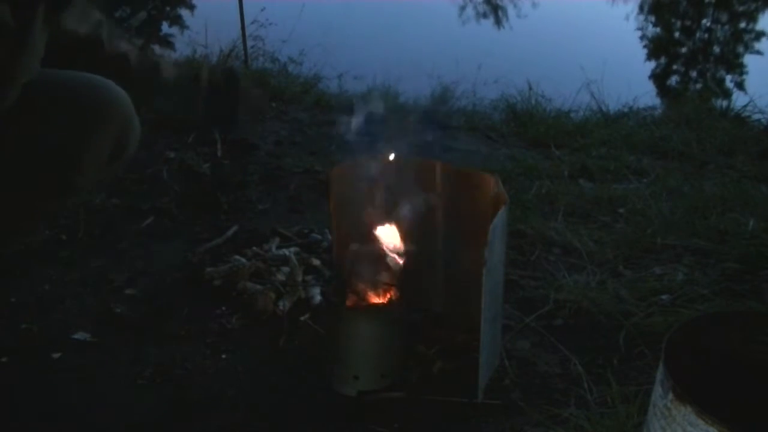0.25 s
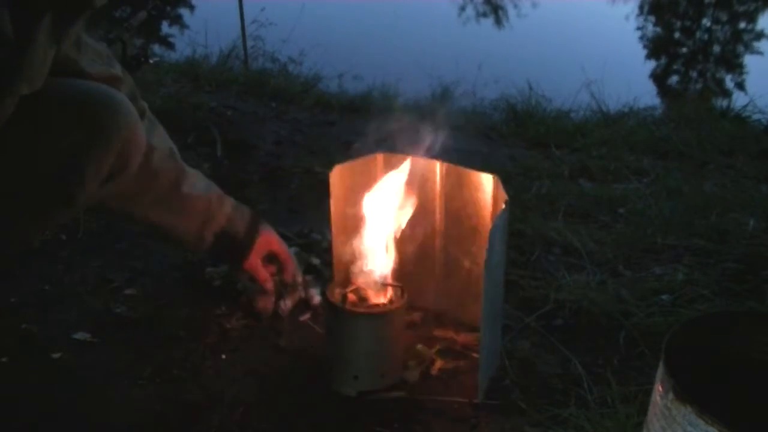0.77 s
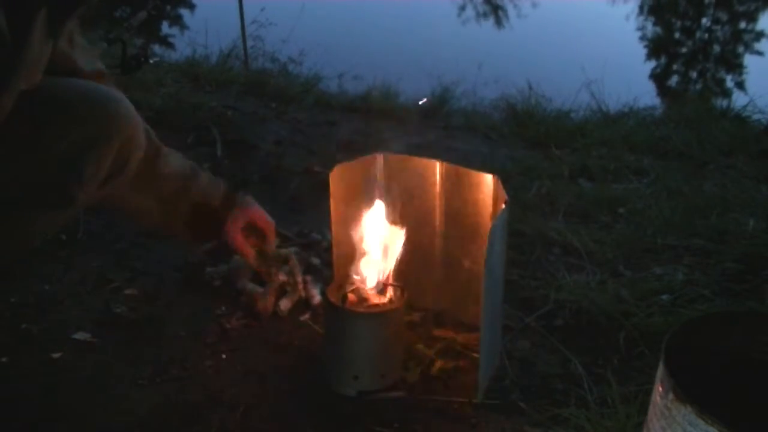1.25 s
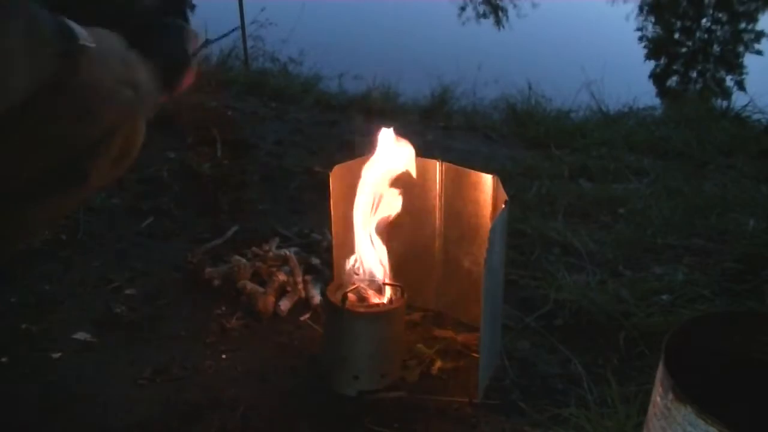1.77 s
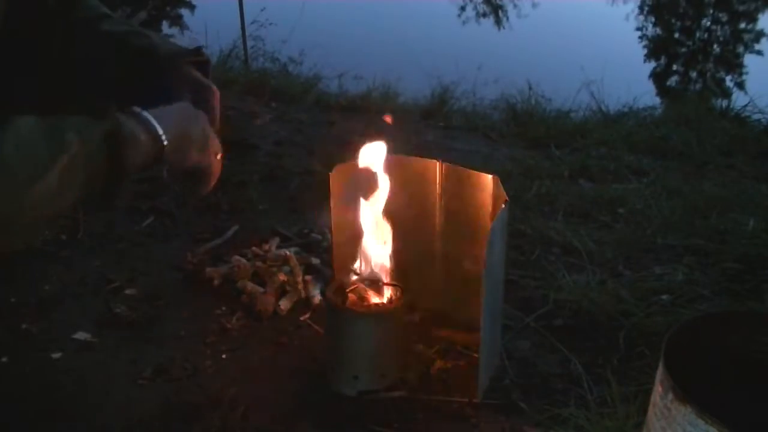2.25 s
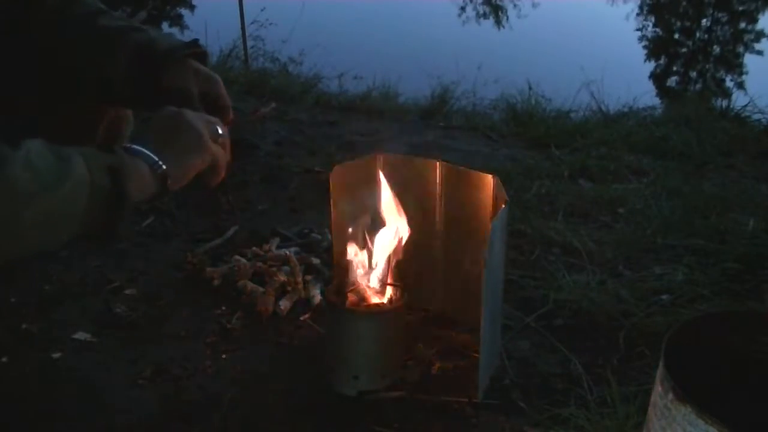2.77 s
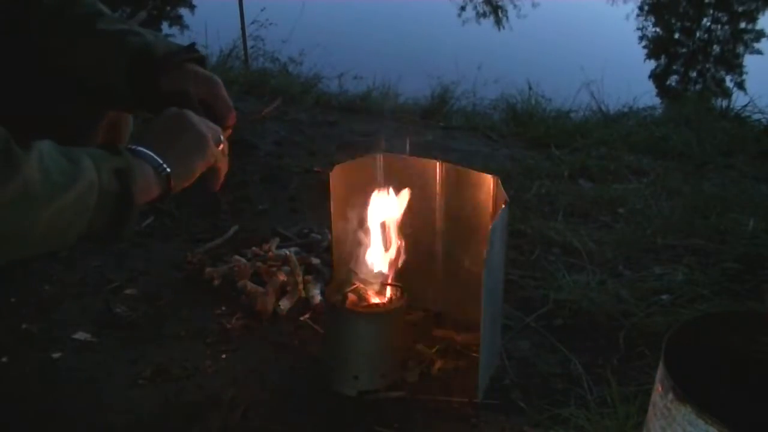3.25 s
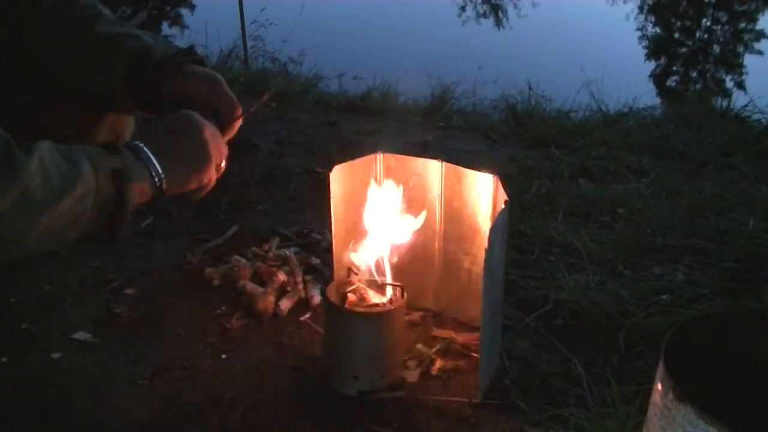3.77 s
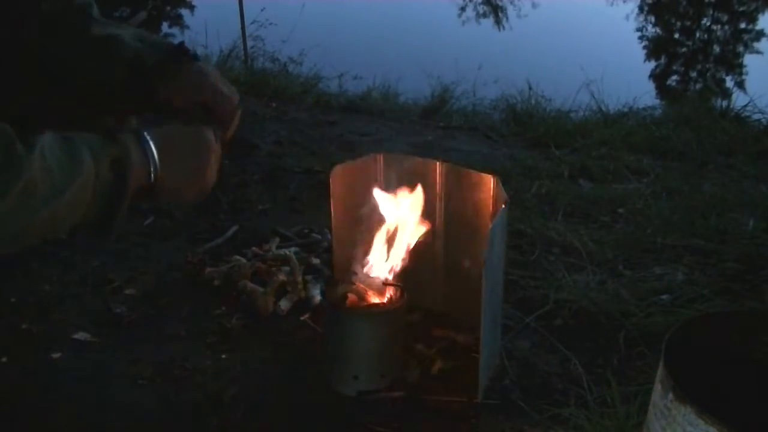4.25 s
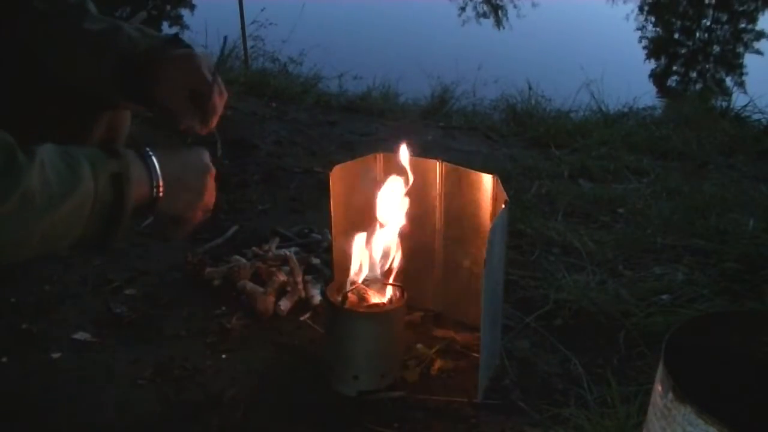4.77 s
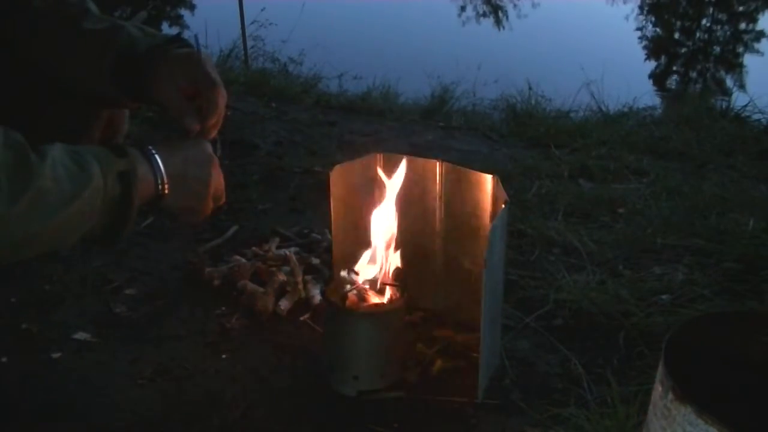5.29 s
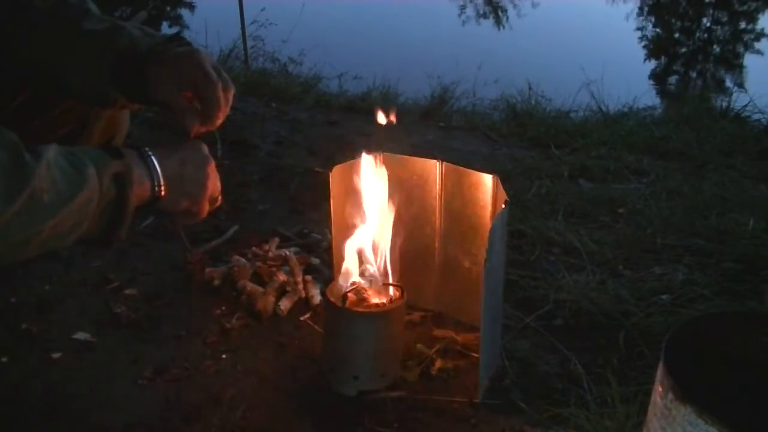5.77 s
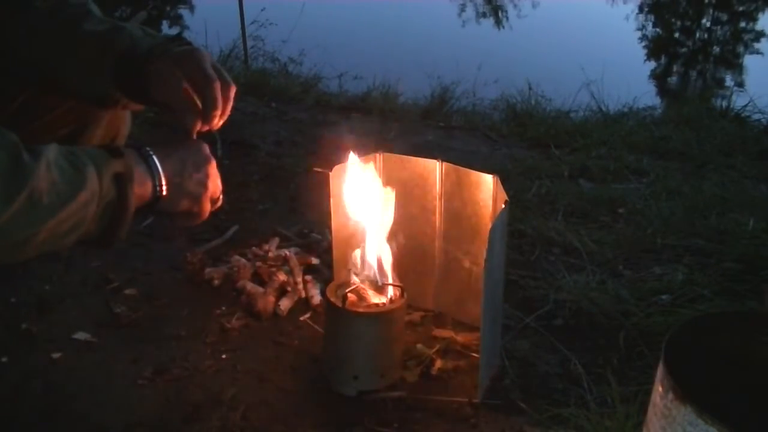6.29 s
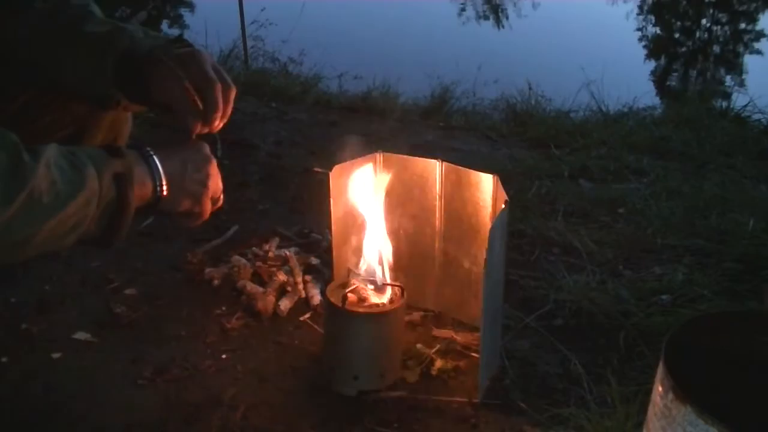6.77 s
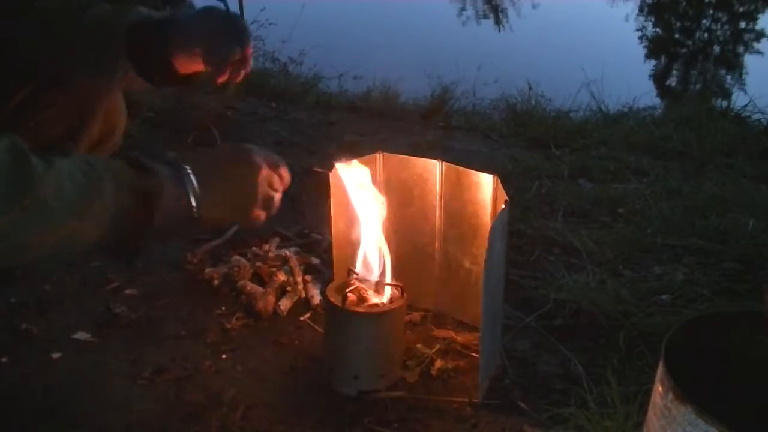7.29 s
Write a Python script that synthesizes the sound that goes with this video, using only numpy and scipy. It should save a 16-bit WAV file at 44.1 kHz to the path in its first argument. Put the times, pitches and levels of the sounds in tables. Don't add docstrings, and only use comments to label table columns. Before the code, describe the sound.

Dry crackles and twig snaps from a little camp stove, one brief hissing cloth slide, and steady high cricket chirping in quiet night air.

```python
import sys
import numpy as np
from scipy import signal
from scipy.fft import rfft, irfft
from scipy.io import wavfile
from scipy.ndimage import uniform_filter1d

SR = 44100
rng = np.random.default_rng(int(sys.argv[2]) if len(sys.argv) > 2 else 0)


def field_ratio(decibels):
    return 10 ** (np.asarray(decibels, dtype=float) / 20)


def output_pcm(signal):
    pcm = np.clip(np.atleast_2d(signal).T, -1, 1) * 32767
    wavfile.write(sys.argv[1], SR, np.round(pcm).astype(np.int16))


N = 332073
HIT_N = 1600

# (f/Hz, level/dB, t60/s)
HOLLOW_MODES = [(893, 6, 0.038), (1500, 3.5, 0.035)]
WALL_MODES = [(2062, -2.5, 0.012), (2792, 1, 0.02)]
BRIGHT_MODES = [(4087, 9, .018), (4800, 7, 0.011), (5550, -2.5, 0.032), (6810, -4.5, 0.014),
                (6930, 0, 0.02)]


def evened(x):
    return x / np.sqrt(np.mean(x ** 2) + 1e-20)


def peaked(x):
    return x / (abs(x).max() + 1e-12)


def curve(rows):
    t_s, *columns = np.transpose(rows)
    return [np.interp(np.arange(N) / SR, t_s, column) for column in columns]


def read(points, hz):
    point_hz, value = np.transpose(points)
    return np.interp(np.log(hz + 1), np.log(point_hz + 1), value)


def resonate(x, hz, width_hz):
    turn = np.exp(2j * np.pi * np.cumsum(hz * np.ones(len(x))) / SR)
    pole = np.exp(-np.pi * width_hz / SR)
    smooth = signal.lfilter([1 - pole], [1, -pole], x / turn + 1e-18)
    return 2 * (turn * smooth).real


def band(x, lo_hz, hi_hz):
    return signal.sosfilt(signal.butter(2, [lo_hz, hi_hz], "bandpass", fs=SR, output="sos"), x)


def highpass(x, order, hz):
    return signal.sosfilt(signal.butter(order, hz, "highpass", fs=SR, output="sos"), x)


def noise(colour, same, patchy_db, flicker_db):
    frames, hz = N // 128 + 5, np.fft.rfftfreq(512, 1 / SR)
    a, b, c, d, patches = rng.standard_normal((frames, 257, 5)).T
    patches = uniform_filter1d(patches, size=6, axis=0)
    patches = evened(uniform_filter1d(patches, size=16, axis=1))
    flicker = evened(uniform_filter1d(rng.standard_normal(frames), size=4))
    same = np.clip(same * np.ones(len(hz)), -1, 1)[:, None]
    left = a + 1j * b
    right = same * left + np.sqrt(1 - same ** 2) * (c + 1j * d)
    level_db = read(colour, hz)[:, None] + patchy_db * patches + flicker_db * flicker
    spectra = np.array([left, right]) * field_ratio(level_db)
    return evened(signal.istft(spectra, nperseg=512, noverlap=384)[1][:, :N])


def ring(modes, t):
    return sum(field_ratio(db - 60 * t / t60) * np.sin(2 * np.pi * hz * t) for hz, db, t60 in modes)


def fire():
    # (t/s, peak/dB, can hollow/dB, wall ring/dB, treble/dB, burst/ms)
    pops = [(0.0301, -30.5, -11, -20, -8, 0.66), (0.1526, -41, -20, -18, -12, 0.9),
            (0.2503, -32, -14, -4, -11, 0.9), (0.4547, -18.5, -20.5, -11, -1.5, 0.9),
            (0.5619, -16, -20.5, -11.5, -11, 0.54), (0.633, -41.5, -2, -7, -6, 0.9),
            (0.6543, -45, -8, -18, -5, 0.9), (0.946, -31.5, -17, -16, -10, 0.9),
            (0.9987, -21.5, -22, -13.5, -21, 0.9), (1.075, -22, -46, -19, -41, 1),
            (1.2775, -38, -0.5, -3.5, -15, 1), (1.4272, -41, -15, -13, -9, 0.9),
            (1.5617, -37.5, -8, -18, -16, 0.9), (2.4568, -42, -9, -6, -11, 0.9),
            (2.5491, -44, -22, 8, -11, 0.9), (2.6552, -29.5, -13, -16, -4, 0.9),
            (2.6999, -21.5, -24, -15.5, -32, 0.62), (2.751, -33.5, -11.5, -10.5, -12, 0.9),
            (2.8744, -53, -8, -16, -6, 0.9), (2.9272, -39, -16, -12, -11, 0.9),
            (2.9725, -28.5, -18, -10.5, -12, 0.9), (3.0278, -31.5, -15.5, -11, -13, 1),
            (3.068, -37.5, -10, -17, -10, 0.77), (3.463, -46.5, -2, -12, 0, 0.9),
            (3.706, -22, -18.5, -11, -8, 0.79), (3.8452, -34.5, -14, -12.5, -16, 0.9),
            (3.914, -31, -16, -14, 4, 1), (4.0043, -44.5, -22, -2, -8, 0.83),
            (4.0345, -33.5, -21, -15, 5, 0.9), (4.1774, -48, 0, -10, -6, 0.9),
            (4.2033, -26.5, -24, -17, -14, 0.76), (4.3077, -35, -19, -16, -9, 0.9),
            (4.396, -40.5, -7, -10, -8, 1), (4.5222, -45, -22, -23, -6, 0.9),
            (4.8799, -45, -5, -16, -7, 0.9), (5.031, -38, -7, -16, -7, 0.9),
            (5.1587, -44, -22, -21, -11, 0.9), (5.3468, -44.5, -5, -7, -8, 0.9),
            (5.3775, -42, -10, -3.5, -11, 0.9), (5.4117, -27, -14.5, -6.5, -10, 0.9),
            (5.4915, -29.5, -10.5, -31, -8, 0.67), (5.5224, -32.5, -13, -9.5, -13, 0.9),
            (5.7399, -43.5, -3, -20, -13, 0.73), (5.8317, -46, -14, -14, -5, 0.9),
            (6.2313, -34, -16, -13, -19, 0.9), (6.4841, -26, -19, -11.5, -7, 1),
            (6.5386, -37, -20, -8, -12, 0.9), (6.6753, -21.5, -44, -18, -35, 0.9),
            (6.6992, -37, -16, -22, -10, 0.9), (6.827, -26, -29, -19, -10, 0.9),
            (6.9442, -33.5, -20, -20, -14, 0.9), (7.243, -22.5, -24.5, -12.5, -39, 1),
            (7.2994, -25.5, -22.5, -23, -32, 0.67)]
    # (t/s, peak/dB, body/dB, low knock/dB, burst/ms)
    snaps = [
        (3.4958, -34.5, -16, -3, 5.3),
        (3.5027, -19.5, -15, -24, 2.5),
        (3.5098, -20.5, -6, -25, 2.2),
        (3.5174, -18, -8, -23, 4.7),
        (4.2036, -43, 6, 4, 4.5),
        (4.2218, -12, -5, -30, 4.7),
        (4.2262, -28, -6, -6, 1.5),
    ]
    # (t/s, peak/dB, f/Hz, t60/s)
    knocks = [(0.014, -41, 493, 0.034), (0.429, -49, 467, 0.03), (0.479, -45, 1020, 0.03),
              (0.623, -43, 1290, 0.041), (0.654, -43, 496, 0.034), (0.699, -45.5, 434, 0.021),
              (0.768, -48.5, 310, 0.03), (0.805, -46, 448, 0.03), (0.819, -46, 490, 0.024),
              (0.839, -51, 358, 0.037), (0.979, -51, 514, 0.027), (0.996, -42, 1500, 0.03),
              (1.275, -37.5, 850, 0.028), (1.769, -45, 1320, 0.03), (2.639, -46, 480, 0.017),
              (2.759, -48, 845, 0.034), (2.846, -47.5, 435, 0.03), (3.026, -46.5, 404, 0.033),
              (3.069, -47.5, 490, 0.027), (3.222, -54.5, 406, 0.034), (3.304, -48.5, 463, 0.024),
              (3.339, -49, 840, 0.033), (3.439, -47, 409, 0.023), (4.349, -53, 415, 0.028),
              (4.439, -55, 266, 0.041), (4.466, -47, 520, 0.039), (4.7, -49.5, 467, 0.033),
              (5.292, -54, 563, 0.032), (6.409, -48.5, 425, 0.024), (6.979, -53, 506, 0.03),
              (7.018, -51, 450, 0.048), (2.549, -33, 1420, 0.033), (2.55, -42, 2430, .03),
              (7.499, -32.5, 3140, 0.049), (7.501, -36, 1410, .03)]
    out = np.zeros(N + HIT_N)
    fade = signal.windows.tukey(2 * HIT_N, .3)[HIT_N:]
    for table, source in ((pops, pop), (snaps, snap), (knocks, knock)):
        for t_s, *shape in table:
            start = round(t_s * SR)
            out[start:start + HIT_N] += source(*shape) * fade
    ticks_per_s = 45
    tick_size = field_ratio(3.8 * np.minimum(rng.exponential(1, N), 4))
    ticks = tick_size * (rng.random(N) < ticks_per_s / SR)
    tick = ring(HOLLOW_MODES + WALL_MODES + BRIGHT_MODES, np.arange(800) / SR)
    bed = field_ratio(-76) * evened(signal.oaconvolve(ticks, tick)[:N])
    hits = highpass(out[:N] + bed, 3, 220)
    right = hits + 0.045 * (np.roll(hits, shift=2) - hits)
    return np.array([hits, right]) * field_ratio(np.array([[.15], [-.15]]))


def pop(db, hollow_db, wall_db, treble_db, burst_ms):
    t = np.arange(HIT_N) / SR
    drive = cracks(t, burst_ms, scatter_db=-13, scatter_t60=.025, share=.05, first=4.0)
    detuned_t = t[:800] * (1 + 0.02 * rng.standard_normal())
    hollow, wall, upper = (peaked(np.convolve(drive, ring(modes, detuned_t))[:len(t)])
                           for modes in (HOLLOW_MODES, WALL_MODES, BRIGHT_MODES))
    bright = peaked(peaked(band(drive, 3630, 9160)) + field_ratio(-7.5) * upper)
    treble = peaked(band(drive, 8000, 15000))
    body = field_ratio(hollow_db - 0.5) * hollow + field_ratio(wall_db) * wall
    return field_ratio(db) * (bright + body + field_ratio(treble_db + 6) * treble)


def snap(db, body_db, knock_db, burst_ms):
    t = np.arange(HIT_N) / SR
    drive = cracks(t, burst_ms, scatter_db=-13, scatter_t60=.02, share=.06, first=2.5)
    bright = band(drive, 4500, 14000)
    body = band(drive - 1.5 * bright, 1300, 4440)
    low = band(drive, 490, 1300)
    return field_ratio(db) * (peaked(bright) + field_ratio(body_db) * peaked(body) + field_ratio(knock_db) * peaked(low))


def knock(db, hz, t60):
    t = np.arange(HIT_N) / SR
    blow = np.hanning(60) * (1 + 2.3 * rng.standard_normal(60))
    modes = ring([(hz, 0, t60), (hz * 1.03, -4, t60 * 0.73), (hz * 2.13, -9, t60 * 0.54)], t)
    return field_ratio(db) * peaked(np.convolve(np.diff(blow), modes)[:len(t)])


def cracks(t, burst_ms, scatter_db, scatter_t60, share, first):
    chance, size = rng.random(len(t)), rng.laplace(size=len(t))
    burst = size * (chance < share) * np.exp(-(t * 1000 / max(burst_ms, .05)) ** 4)
    burst[0] = first
    tail_db = scatter_db - 60 * np.maximum(t - burst_ms / 1000, 0) / scatter_t60
    return burst + field_ratio(tail_db) * rng.standard_normal(len(t))


def flame():
    # (t/s, level/dB)
    flutter = [(0.0, -57.5), (0.52, -62), (0.77, -56), (0.92, -63.5), (1.09, -64), (1.61, -62),
               (1.86, -58.5), (2.12, -62.5), (2.29, -62.5), (2.75, -62), (3.88, -65), (4.28, -56.5),
               (4.45, -62), (5.18, -68), (5.51, -67.5), (7.0, -66), (7.15, -69.5), (7.53, -61.5)]
    # (f/Hz, level/dB)
    flame_colour = [(40, -51), (100, -22.5), (220, -3), (450, 1.5), (900, -5.5), (1800, -10.5), (4000, -40)]
    return field_ratio(curve(flutter)[0] - 3.0) * noise(flame_colour, 0.86, patchy_db=3.0, flicker_db=2.0)


def slide():
    # (t/s, level/dB, low shelf/dB, high shelf/dB)
    drag = [
        (1.44, -62, 1, -2),
        (1.544, -49, 1, -2),
        (1.568, -40.5, -15, 3),
        (1.718, -38, -14, 3.5),
        (1.76, -42.5, -1.5, 2.5),
        (2.254, -45, 4, 0),
        (2.272, -43, 2, 3),
        (2.328, -60, 4, 4),
        (2.36, -52, 1, 0.5),
    ]
    # (f/Hz, level/dB per Hz)
    drag_colour = [(180, -52), (300, -29), (431, -11), (720, -9.5), (1050, -5), (1640, -6), (1970, -2),
                   (2210, -4.5), (3020, -2), (3870, -6), (5050, -7), (8140, -17.5), (11300, -20.5),
                   (15500, -35)]
    # (t/s, f/Hz, level/dB)
    fold_path = [(1.55, 1330, -12), (1.62, 1500, -7), (1.68, 1980, 0), (1.72, 2230, 1), (1.76, 2960, -9),
                 (1.81, 2640, -14), (1.87, 2020, -9), (1.95, 1050, -5), (2.0, 1090, -6), (2.05, 2640, -13),
                 (2.15, 3050, -6), (2.22, 3430, -9), (2.3, 3000, -28)]
    db, low_db, high_db = curve(drag)
    fold_hz, fold_db = curve(fold_path)
    rub = noise(drag_colour, .99, patchy_db=1.5, flicker_db=0.63)
    low = signal.filtfilt(*signal.butter(1, 1300, fs=SR), rub)
    high = signal.filtfilt(*signal.butter(1, 4000, "highpass", fs=SR), rub)
    fold = evened(resonate(rub[0], fold_hz, width_hz=700))
    t = np.arange(N) / SR
    fade_in = np.clip((t - drag[0][0]) / 0.031, 0, 1)
    fade_out = np.clip((drag[-1][0] - t) / 0.016, 0, 1)
    tilted = rub + (field_ratio(low_db) - 1) * low + (field_ratio(high_db) - 1) * high
    return field_ratio(db) * fade_in * fade_out * (tilted + field_ratio(fold_db - 3) * fold)


def rustle():
    # (t/s, level/dB)
    movement = [
        [(0.0, -55.5), (0.258, -55.5), (1.032, -62), (1.26, -61), (1.5, -56.5)],
        [(2.33, -57), (2.59, -54), (2.73, -62.5), (3.04, -65), (3.73, -66.5), (4.21, -60.5), (5.13, -69.5),
         (5.65, -61.5), (5.99, -68), (7.2, -65.5), (7.41, -57.5), (7.53, -54.5)],
    ]
    # (f/Hz, level/dB)
    cloth_colour = [(300, -42), (800, -0.5), (1500, 0.5), (3000, -1), (6000, -7), (12000, -20.5),
                    (16000, -46)]
    level = field_ratio(curve(movement[0] + movement[1])[0] + 0.5)
    return level * noise(cloth_colour, 0.99, patchy_db=2.5, flicker_db=2.5)


def cricket(bouts, strokes, wing, db, spread_db, grass_t60):
    teeth_per_s, lead = 6000, 300
    t, level = np.arange(N) / SR, np.zeros(N)
    share, stroke_db = np.transpose(strokes)
    for bout in bouts:
        t_s, number = np.transpose(bout)
        at = np.interp(t, t_s, number)
        vary_db = spread_db * rng.standard_normal(64)[at.astype(int)]
        level += field_ratio(np.interp(at % 1, share, stroke_db) + vary_db) * (t > t_s[0]) * (t < t_s[-1])
    teeth = rng.standard_normal(N) * (rng.random(N) < teeth_per_s / SR)
    driven = teeth * uniform_filter1d(level, size=120)
    lag, hz = np.arange(4096) / SR, np.fft.rfftfreq(4096, 1 / SR)
    paths = rng.standard_normal((2, 4096)) * field_ratio(-60 * lag / grass_t60)
    paths[1] = paths[0] + 0.29 * paths[1]
    tuning = sum(field_ratio(g) / (1 + (2 * (hz - f) / w) ** 2) ** 2 for f, w, g in wing)
    way = np.roll(irfft(rfft(paths) * tuning), shift=lead, axis=1)
    song = signal.oaconvolve(driven[None], way / np.linalg.norm(way[0]), axes=1)
    return field_ratio(db) * song[:, lead:N + lead] / np.sqrt(teeth_per_s / SR)


def low_cricket():
    # (t/s, chirp number)
    low_bouts = [
        [(0.001, 0), (1.355, 8), (2.2, 13), (3.193, 19), (3.53, 21)],
        [(4.0, 0), (4.664, 4), (6.029, 12), (6.53, 15), (7.56, 21)],
    ]
    # (share of chirp, level/dB)
    low_strokes = [(0, 9), (.04, 3), (.12, 1.5), (.26, -2), (.33, 6), (.5, -4.5), (.58, -2.5), (.7, -28.5),
                   (.8, -34), (1, -12)]
    # (f/Hz, width/Hz, level/dB)
    low_wing = [(9626, 1440, 0), (10450, 810, 1.5)]
    return cricket(low_bouts, low_strokes, low_wing, db=-58, spread_db=1.04, grass_t60=0.085)


def high_cricket():
    # (t/s, chirp number)
    high_bouts = [
        [(0.021, 0), (0.37, 2), (0.59, 3), (1.259, 7), (2.799, 16), (4.15, 24), (5.822, 34), (6.155, 36)],
        [(6.63, 0), (7.57, 6)],
    ]
    # (share of chirp, level/dB)
    high_strokes = [(0, -5), (.04, 5), (.13, -3.5), (.2, -6), (.3, 0), (.35, 8), (.5, -2), (.6, -5),
                    (.8, -11), (1, -9)]
    # (f/Hz, width/Hz, level/dB)
    high_wing = [(11000, 1300, 6), (11800, 150, 7), (12640, 1400, -4)]
    return cricket(high_bouts, high_strokes, high_wing, db=-62, spread_db=-0.7, grass_t60=.05)


def night_air():
    # (f/Hz, level/dB per Hz)
    air_colour = [(18, -53), (30, -23), (48, -28), (98, -18.5), (412, -1), (626, 0.5), (880, 0.5),
                  (1000, 0.5), (1530, -2), (1690, -2.5), (3350, -5.5), (7540, -11), (10300, -4),
                  (15700, -21.5)]
    # (f/Hz, left-right likeness)
    air_same = [(60, 0.28), (150, 0.26), (380, 0.38), (950, 0.25), (2380, 0.3), (5980, 0.93), (15000, 1)]
    same = read(air_same, np.fft.rfftfreq(512, 1 / SR))
    return field_ratio(-58.5) * noise(air_colour, same, patchy_db=0.6, flicker_db=-0.8)


def scene():
    stove = fire() + flame()
    cloth = slide() + rustle()
    crickets = low_cricket() + high_cricket()
    return stove + cloth + crickets + night_air()


def roll_off(x):
    return signal.sosfilt(signal.butter(12, 16990, fs=SR, output="sos"), x)


def record(dry):
    thin = highpass(dry, 1, 60)
    lowpass = signal.firwin(255, 16300, window=("kaiser", 9), fs=SR)
    cut = signal.oaconvolve(thin, lowpass[None], "same")
    return roll_off(cut)


dry = scene()
out = record(dry)
output_pcm(out)
```